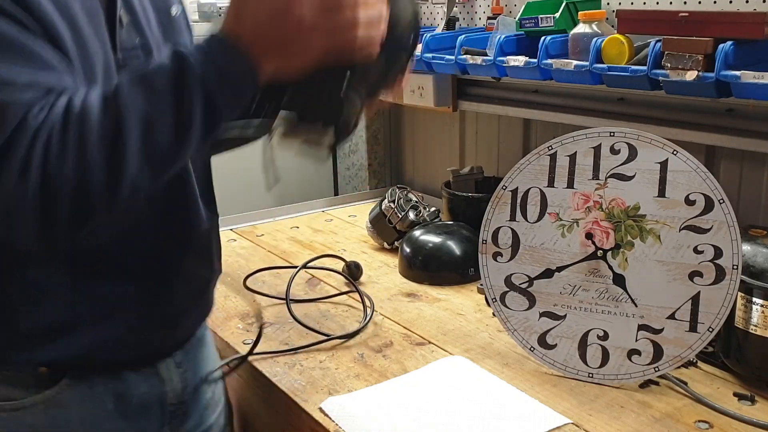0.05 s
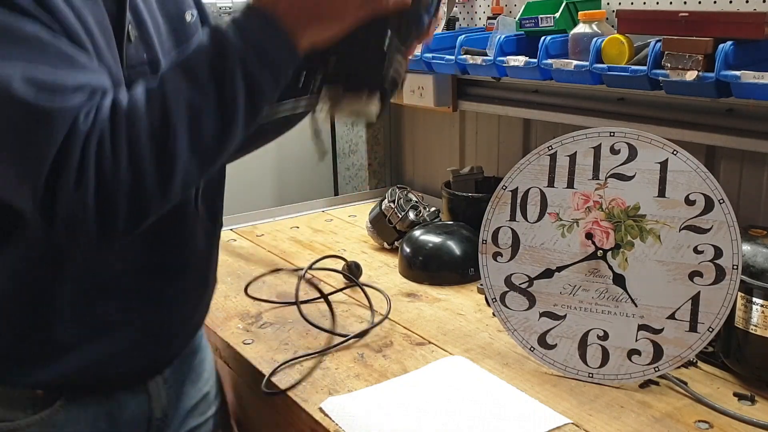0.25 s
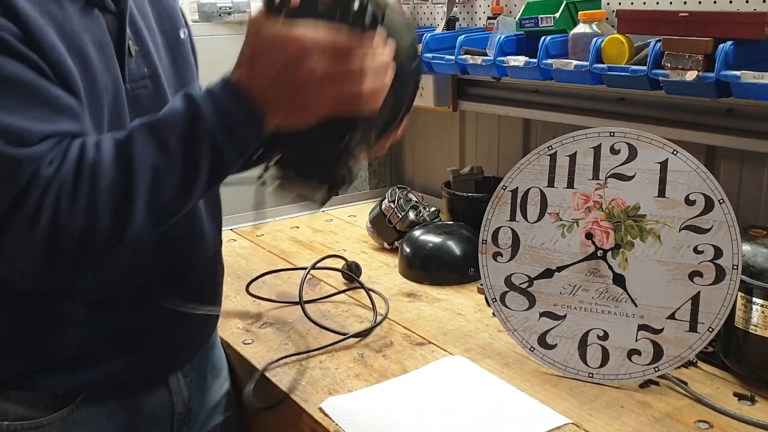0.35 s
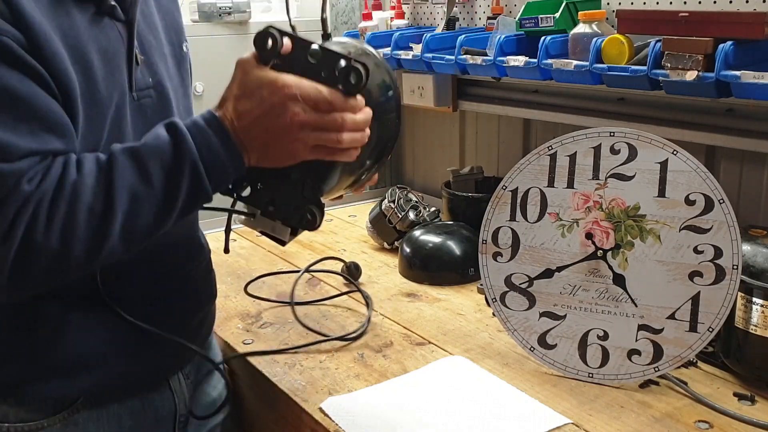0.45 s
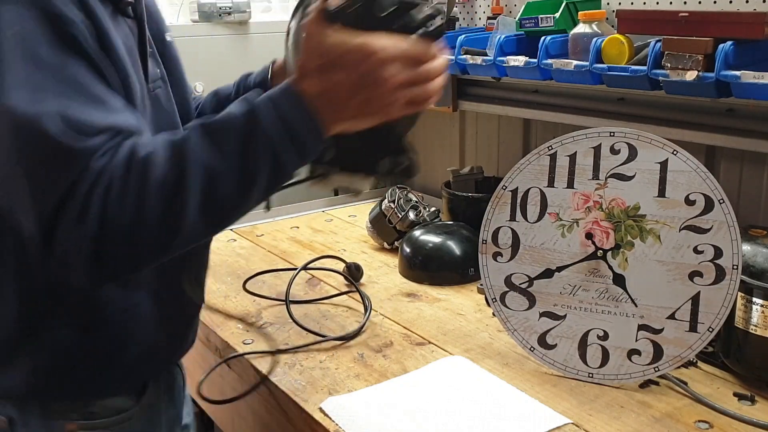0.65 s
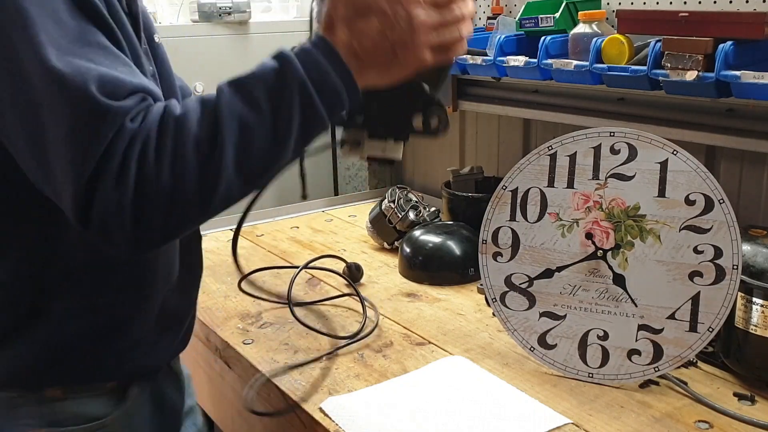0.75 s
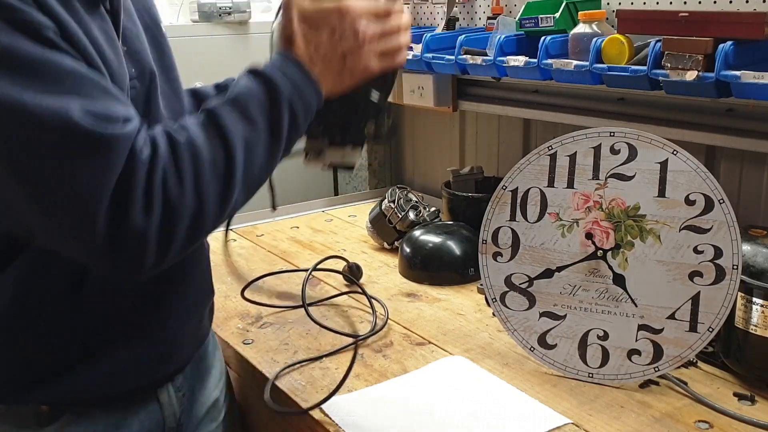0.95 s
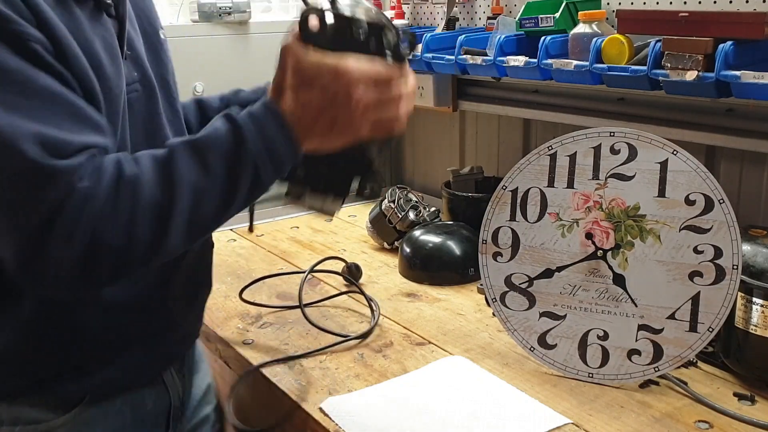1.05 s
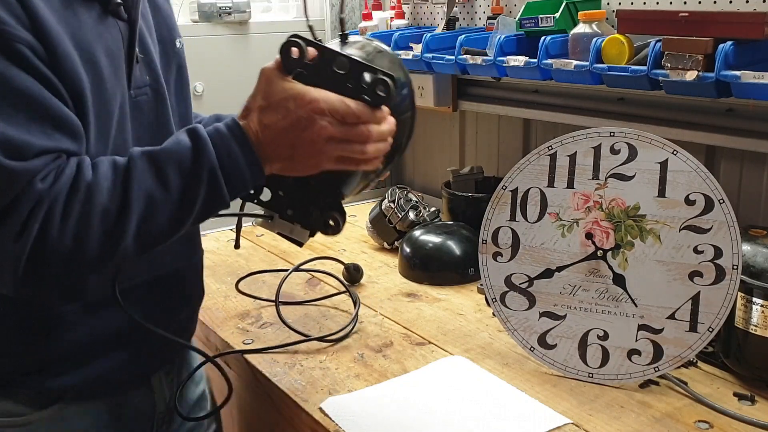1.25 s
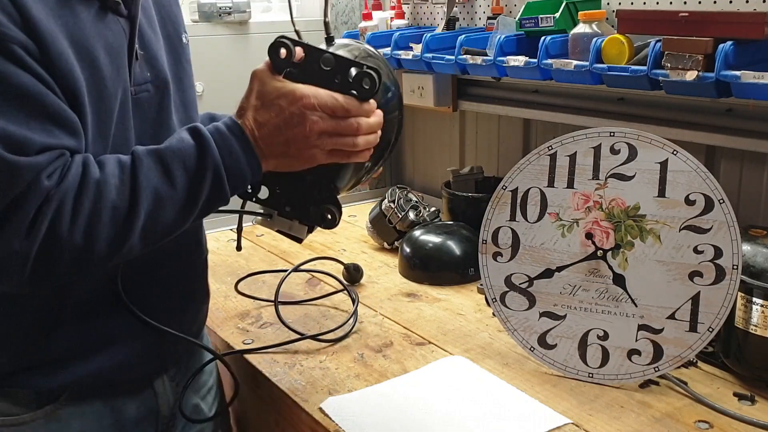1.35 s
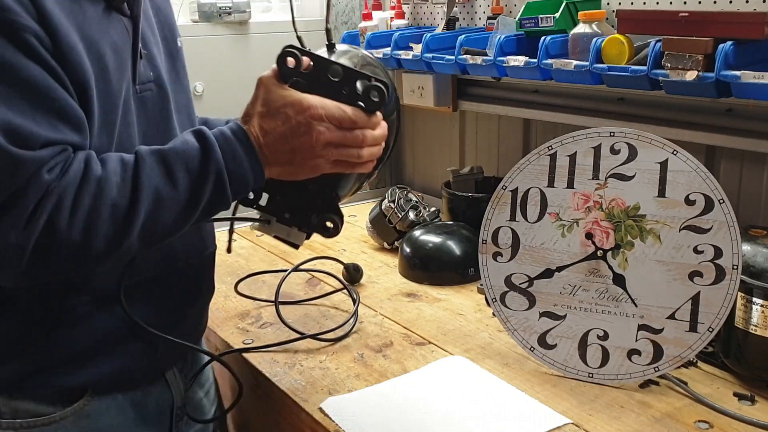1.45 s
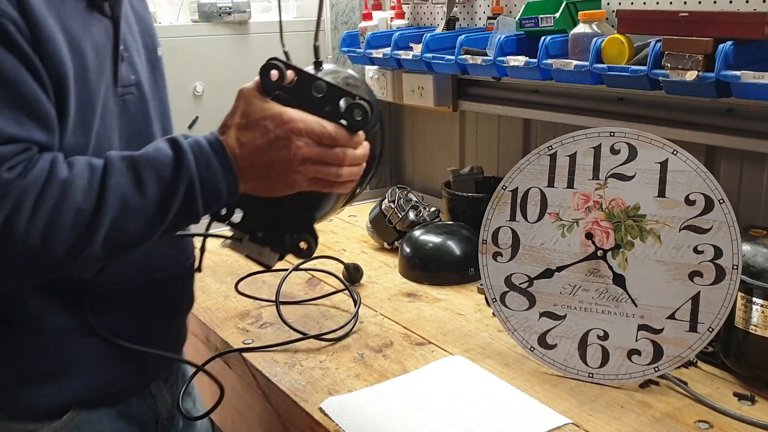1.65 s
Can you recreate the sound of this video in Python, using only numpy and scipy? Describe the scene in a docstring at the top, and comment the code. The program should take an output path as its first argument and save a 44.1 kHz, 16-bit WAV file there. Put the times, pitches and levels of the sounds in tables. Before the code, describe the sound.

Heavy metal compressor shaken by hand, loose parts knocking and rattling inside.

```python
"""A loose motor knocks inside a heavy steel compressor shell, shaken by hand in a small workshop.
Each impact excites the normal modes of the shell: a dull thud with a short steel ring. Between impacts
the motor rebounds, bottoms on its mounts and scrapes along the wall by stick-slip friction; one small
part ticks. The close walls reverberate, over a low rustle of handling and a faint room noise."""
import sys
import numpy as np
from scipy import signal
from scipy.fft import rfft, irfft, next_fast_len
from scipy.io import wavfile

SR = 44100
rng = np.random.default_rng(int(sys.argv[2]) if len(sys.argv) > 2 else 0)


def wrap_up_sound(samples):
    """Save the sound to the file named by the first command line argument, as 16-bit audio."""
    columns = np.atleast_2d(samples).T
    # keep every value between -1 and 1, then stretch to whole-number steps
    tamed = np.clip(columns, -1, 1)
    steps = np.round(tamed * 32767).astype(np.int16)
    wavfile.write(sys.argv[1], SR, steps)


N = 74970
T = np.arange(SR // 2) / SR  # time within one event [s]


def amp(db):
    """The decibel law: amplitude ratio from level."""
    return 10 ** (np.asarray(db) / 20)


def unit(x):
    """Power normalisation: scale to rms 1."""
    return x / np.sqrt(np.mean(x ** 2) + 1e-20)


def blow(x, duration_s=.03):
    """Energy normalisation: a transient gets the energy of rms 1 held for duration_s."""
    return x / np.sqrt(np.sum(x ** 2) / (duration_s * SR) + 1e-20)


def add(out, start_s, x):
    """Superposition: x adds to out from start_s on."""
    i = max(0, round(start_s * SR))
    out[i:i + len(x)] += x[:max(0, N - i)]


def colour(x, spectrum):
    """Minimum-phase filtering: a causal response from (frequency [Hz], gain [dB]) points."""
    hz, db = np.transpose(spectrum)
    size = next_fast_len(len(x) + SR // 10, True)
    bin_hz = np.fft.rfftfreq(size, 1 / SR)
    gain = amp(np.interp(np.log(bin_hz + 1), np.log(hz + 1), db))
    cepstrum = irfft(np.log(gain), size)
    cepstrum[1:size // 2] *= 2  # fold onto positive time
    cepstrum[size // 2 + 1:] = 0
    return irfft(rfft(x, size) * np.exp(rfft(cepstrum)), size)[:len(x)]


def room(direct_db, t60, wall_delay_s=.00092, rise_s=.0015):
    """Diffuse reverberation: a direct impulse, then dense reflections that decay exponentially."""
    rise = 1 - np.exp(-np.maximum(T - wall_delay_s, 0) / rise_s)
    response = rng.standard_normal(len(T)) * rise * amp(-60 * T / t60)
    response /= np.linalg.norm(response)
    response[0] += amp(direct_db)
    return response


def ring(hz, db, t60, scatter_db, rise_s=.00067, blur_rad=.22):
    """Modal synthesis: damped sinusoids of random strength, roughened by a random walk of phase."""
    steps = rng.standard_normal((len(hz), len(T) // 100 + 1))
    drift = np.cumsum(steps, axis=1).repeat(100, axis=1)[:, :len(T)]
    phase = 2 * np.pi * (hz[:, None] * T + rng.random((len(hz), 1))) + blur_rad * drift
    struck_db = db + scatter_db * rng.standard_normal(len(hz))
    decay = amp(struck_db[:, None] - 60 * T / t60[:, None])
    return blow(np.sum(decay * np.sin(phase), axis=0) * (1 - np.exp(-T / rise_s)))


# Envelope of the handling rustle (time [s], level [dB])
RUSTLE_ENVELOPE = [(0, -62.5), (.1, -74), (.2, -70.5), (0.449, -57.5), (.6, -57.5), (0.692, -65.5),
                   (.9, -43), (1.1, -57.5), (1.28, -58), (1.45, -74), (1.6, -70.5), (1.7, -87)]
# Spectra of the rustle and the room noise (frequency [Hz], relative level [dB])
RUSTLE_SPECTRUM = [(40, 4.5), (150, 3), (380, 8.5), (600, 4), (900, -4), (1400, -15), (3200, -28),
                   (6000, -45.5), (15000, -57)]
ROOM_SPECTRUM = [(20, -29.5), (50, 10), (80, -2.5), (200, -1.5), (450, -11.5), (1200, -24.5), (2100, -13.5),
                 (3000, -21), (7000, -35.5), (11000, -26.5), (15500, -31.5)]
def background(room_db=-73):
    """Amplitude-modulated noise: the rustle of handling swells and fades over stationary room noise."""
    envelope = amp(np.interp(np.arange(N) / SR, *np.transpose(RUSTLE_ENVELOPE)))
    rustle = unit(colour(rng.standard_normal(N), RUSTLE_SPECTRUM))
    room_noise = unit(colour(rng.standard_normal(N), ROOM_SPECTRUM))
    return envelope * rustle + amp(room_db) * room_noise


# Spectrum of a light contact, tick or scrape (frequency [Hz], relative level [dB])
LIGHT_SPECTRUM = [(100, -12), (300, -5), (750, 2), (890, 6.5), (1030, 0), (1160, 6.5), (1290, -6.5),
                  (1440, 2.5), (1650, -3), (1950, -0.5), (2300, -12), (2900, -5), (4000, -16), (6500, -31),
                  (8000, -37), (15000, -41)]
def tick(start_s=.5725, level_db=-50, decay_s=.0007):
    """A damped transient: one small part clicks without ringing the shell."""
    out = np.zeros(N)
    noise = unit(colour(rng.standard_normal(len(T)), LIGHT_SPECTRUM))
    add(out, start_s, amp(level_db) * noise * np.exp(-T / decay_s))
    return out


# Slides of the motor (time [s], duration [s], relative level [dB])
SLIDES = [(0.3285, 0.013, -35.5), (0.339, 0.034, -47), (0.433, 0.11, -61.5), (0.533, 0.025, -59),
          (0.551, 0.047, -65), (1.06, .03, -66), (1.117, 0.049, -61.5)]
def scrapes(slips_per_s=4000, spread_db=2.5):
    """Stick-slip friction: the motor slides along the shell in tiny irregular slips."""
    friction, t = np.zeros(N), np.arange(N) / SR
    impulses = (rng.random(N) < slips_per_s / SR) * rng.choice([-1, 1], N)
    slips = unit(impulses * amp(spread_db * rng.standard_normal(N)))
    for start_s, duration_s, db in SLIDES:
        progress = np.clip((t - start_s) / duration_s, 0, 1)
        friction += amp(db) * slips * np.sqrt(np.abs(np.sin(np.pi * progress)))
    radiated = colour(friction, LIGHT_SPECTRUM) / np.std(colour(slips, LIGHT_SPECTRUM))
    return signal.fftconvolve(radiated, room(direct_db=3.5, t60=.22))[:N]


# Modes of the mounted motor (frequency [Hz], relative level [dB], T60 [s])
MOUNT_MODES = [(262, -4, .06), (350, 0, .08), (480, -2, .06), (640, -6, .05)]
# Spectrum of the low push (frequency [Hz], relative level [dB])
PUSH_SPECTRUM = [(25, -35), (55, -5), (100, 1.5), (200, 7.5), (400, 7), (1000, -61), (4000, -100)]
# Bumps on the mounts (time [s], hollow note level [dB], push level [dB])
MOUNT_BUMPS = [(0.209, -47.5, -77), (.247, -48, -43), (0.399, -37, -49), (.424, -45, -66),
               (.724, -55.5, -82), (.769, -44.5, -65), (0.917, -43.5, -42.5), (0.9998, -41.5, -71),
               (1.004, -42, -63), (1.3184, -35, -51.5), (1.328, -36, -46.5), (1.366, -45, -73),
               (1.431, -44, -72), (1.521, -66, -68.5), (1.548, -65.5, -72)]
def bumps():
    """Cushioned impact: the motor bottoms on its mounts with a low push and a damped, hollow note."""
    out = np.zeros(N)
    for start_s, hollow_db, push_db in MOUNT_BUMPS:
        hollow = ring(*np.transpose(MOUNT_MODES), scatter_db=-1.8, rise_s=.00051)
        push = blow(colour(room(direct_db=4, t60=.15), PUSH_SPECTRUM))
        add(out, start_s, amp(hollow_db) * hollow + amp(push_db) * push)
    return out


# Spectrum of the thud (frequency [Hz], relative level [dB])
THUD_SPECTRUM = [(30, -27.5), (70, -24.5), (120, -19.5), (170, -1), (350, 5), (550, 2), (900, -4),
                 (1300, -31.5), (2500, -10.5), (6000, -46)]
# Low shell modes (frequency [Hz], T60 [s], relative level struck at top, wall, seam, base [dB])
LOW_MODES = [(157, .33, -5, 1, -4, -13), (266, .2, -6, -8, -7, -2), (356, .33, -3, -6, -4, 0),
             (411, .24, -8, 0, -1, -4), (464, .25, -4, -1, -1, -2), (532, .22, -2, -4, -1, -4),
             (602, .22, -3, -8, -10, -7), (706, .3, 0, -6, -2, -8), (753, .24, -4, -6, -4, -10),
             (812, .22, -9, -4, -8, -7), (866, .24, -4, -7, -4, -15), (996, .22, -9, -8, -6, -10),
             (1193, .36, -7, -16, -14, -20)]
def thud(place):
    """Momentum transfer: the motor's mass gives a dull pulse and excites the low modes of the shell."""
    hz, t60, *db_at = np.transpose(LOW_MODES)
    pulse = blow(colour(room(direct_db=-2, t60=.2), THUD_SPECTRUM))
    body = ring(hz, db_at[place], t60, scatter_db=6)
    return amp(-7) * pulse + amp(-6.5) * body


# High shell modes (frequency [Hz], relative level struck at top, wall, seam, base [dB])
HIGH_MODES = [(1355, -9, -9, -9, -17), (1590, -7, -11, -6, -15), (1750, -13, -8, -13, -17),
              (2552, -2, -17, -18, -20), (2660, -5, -19, -22, -24), (2778, 0, -19, -20, -24),
              (2918, -19, -2, -14, -18), (3031, -19, -1, -15, -17), (3142, -19, -3, 0, 0),
              (3338, -21, -2, -3, -15), (3402, -9, -6, -7, -15), (3505, -18, -15, -7, -12),
              (3882, -15, -16, -16, -3), (4420, -13, -16, -14, -14), (5052, -18, -22, -8, -20),
              (5405, -18, -11, -19, -22), (6735, -14, -26, -26, -30)]
def steel_ring(place):
    """Frequency-dependent damping: the steel vibrates freely and its higher modes die sooner."""
    hz, *db_at = np.transpose(HIGH_MODES)
    t60 = .23 * (3000 / hz) ** .2
    return ring(hz, db_at[place], t60, scatter_db=2)


def contact(spectrum, chatter_s, direct_db, t60):
    """Contact chatter: steel on steel gives a brief noise burst, convolved with the room response."""
    burst = rng.standard_normal(SR // 20) * np.exp(-T[:SR // 20] / chatter_s)
    reverberant = signal.fftconvolve(burst, room(direct_db, t60))[:len(T)]
    return blow(colour(reverberant, spectrum))


# Spectra of the hard edges in contact (frequency [Hz], relative level [dB])
CRUNCH_SPECTRUM = [(300, -30.5), (850, 8.5), (1200, -2), (1600, -4), (2100, -16), (3000, -21.5),
                   (8000, -67)]
CLACK_SPECTRUM = [(500, -31), (1500, -11), (2100, -10.5), (2700, 1), (3350, 8), (4100, -1), (4600, -1.5),
                  (5400, -5), (7500, -22.5), (14000, -59.5)]
SIZZLE_SPECTRUM = [(2000, -49.5), (5000, 2.5), (6700, 2), (7700, -2), (9800, 2.5), (11800, -2.5),
                   (13000, -7), (15800, -16)]
# Points of impact, in the order of the mode columns (top, wall, seam, base)
IMPACT_SPOTS = ("top", "wall", "seam", "base")
# Impacts on the shell (time [s], relative level of thud, clack, sizzle, ring [dB], spot struck)
IMPACTS = [(.002, -56, -63.5, -87, -82, "top"), (.02, -74, -80.5, -74, -70, "wall"),
           (.15, -85, -72, -85, -75, "wall"), (.2168, -29, -35, -49.5, -38, "top"),
           (.238, -29, -44, -51, -39.5, "top"), (0.3726, -28, -39, -43.5, -33, "wall"),
           (.385, -28, -32.5, -50, -47, "wall"), (.464, -50, -65, -68, -79, "wall"),
           (0.634, -70, -100, -106, -90, "wall"), (0.7663, -46, -50.5, -73.5, -67, "base"),
           (0.815, -40, -48, -73, -54, "wall"), (0.8232, -26, -34, -38, -37, "seam"),
           (0.8377, -32, -35.5, -48, -38.5, "seam"), (0.9189, -27, -33.5, -42.5, -39, "base"),
           (1.007, -42.5, -50, -61.5, -64, "base"), (1.1445, -44.5, -45, -66.5, -51.5, "wall"),
           (1.153, -32, -49, -58.5, -47, "seam"), (1.183, -36.5, -43, -55, -58, "seam"),
           (1.294, -49.5, -84, -68, -62.5, "wall"), (1.312, -44, -62, -81.5, -71.5, "base"),
           (1.32, -36.5, -42, -55.5, -43, "wall"), (1.351, -41, -81, -77, -62, "base"),
           (1.3997, -37, -46, -61.5, -47, "base"), (1.425, -68, -58.5, -72, -58, "base")]
def knocks(hard_knock_db=-34, crunch_growth=1.37):
    """Impact excitation: the motor's mass thuds, hard edges crunch, clack and sizzle, the steel rings."""
    out = np.zeros(N)
    for start_s, thud_db, clack_db, sizzle_db, ring_db, spot in IMPACTS:
        place = IMPACT_SPOTS.index(spot)
        # In softer knocks the crunch weakens faster than the clack.
        crunch_db = -37.5 + crunch_growth * (clack_db - hard_knock_db)
        knock = amp(thud_db) * thud(place)
        knock += amp(clack_db - 9.5) * contact(CLACK_SPECTRUM, chatter_s=.0011, direct_db=-12.5, t60=.23)
        knock += amp(crunch_db) * contact(CRUNCH_SPECTRUM, chatter_s=.00091, direct_db=-2.5, t60=.2)
        knock += amp(sizzle_db - 5) * contact(SIZZLE_SPECTRUM, chatter_s=.0037, direct_db=-10, t60=.2)
        knock += amp(ring_db - 4.5) * steel_ring(place)
        add(out, start_s, knock)
    return out


def scene():
    """Linear superposition: the pressures of all sources add at one point."""
    return (knocks() + bumps() + scrapes() + tick() + background())[None]


def record(dry, low_cut_hz=42, top_hz=15900):
    """Band limiting: a second-order high-pass thins the deepest bass; nothing above top_hz passes."""
    size = next_fast_len(N + SR // 2)
    hz = np.fft.rfftfreq(size, 1 / SR)
    s = 1j * hz / low_cut_hz
    high_pass = s * s / (s * s + s + 1)
    return irfft(rfft(dry, size) * high_pass * (hz < top_hz), size)[..., :N]


dry = scene()
out = record(dry)
wrap_up_sound(out)
```